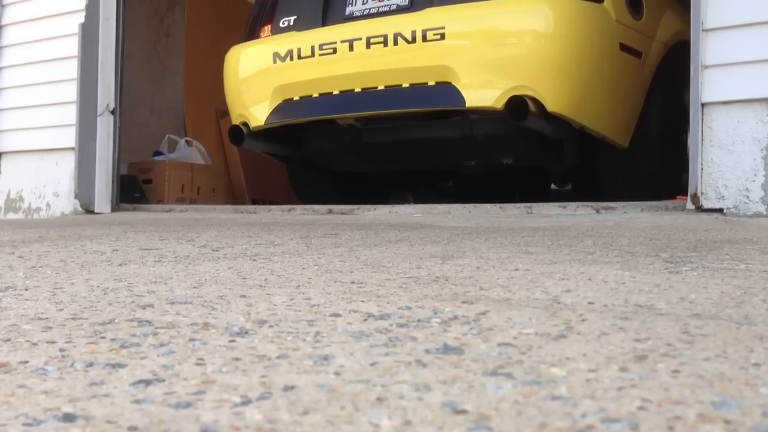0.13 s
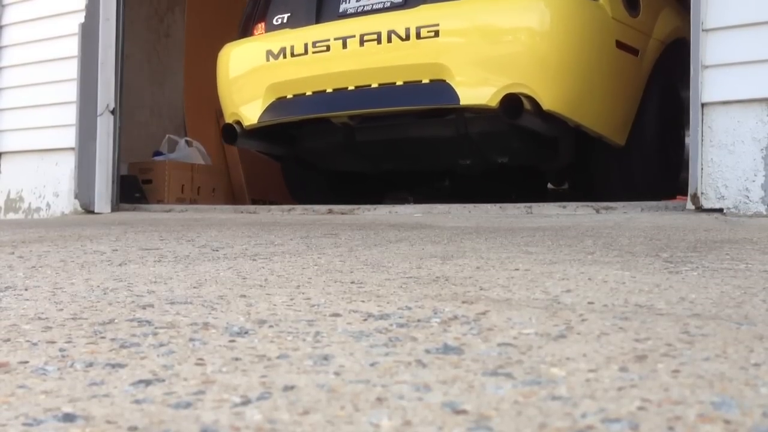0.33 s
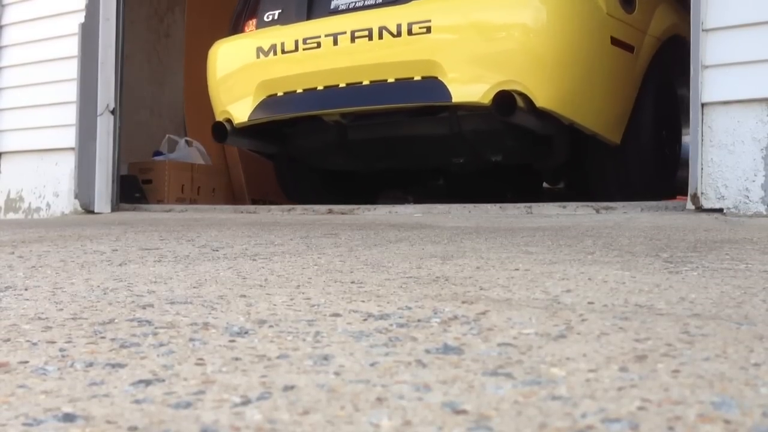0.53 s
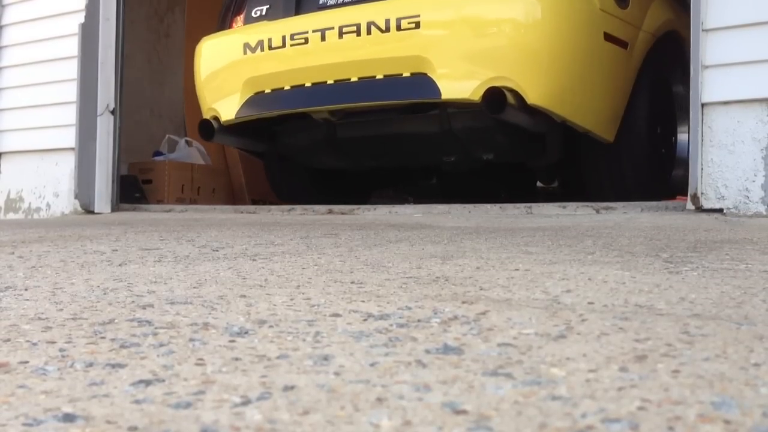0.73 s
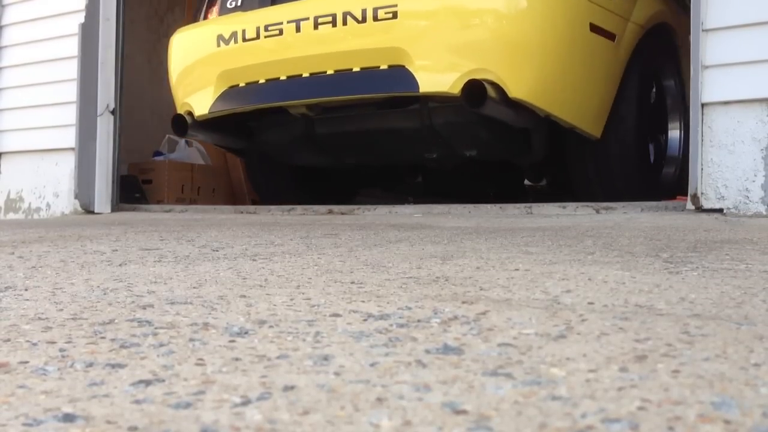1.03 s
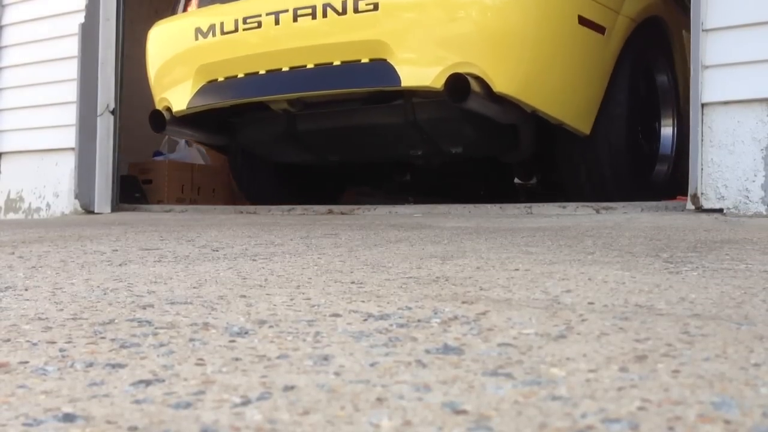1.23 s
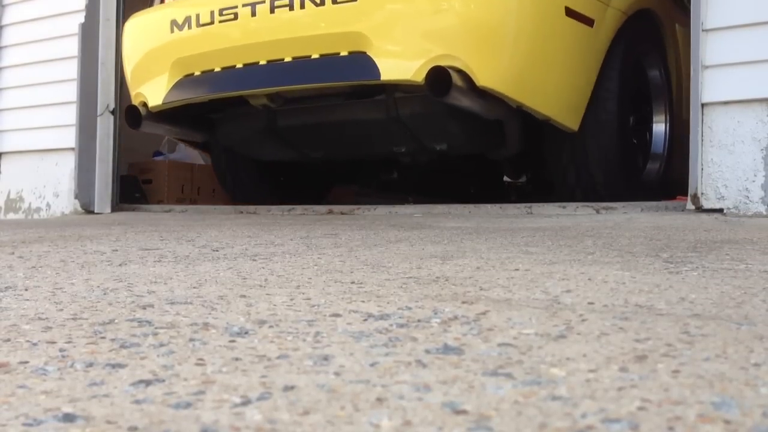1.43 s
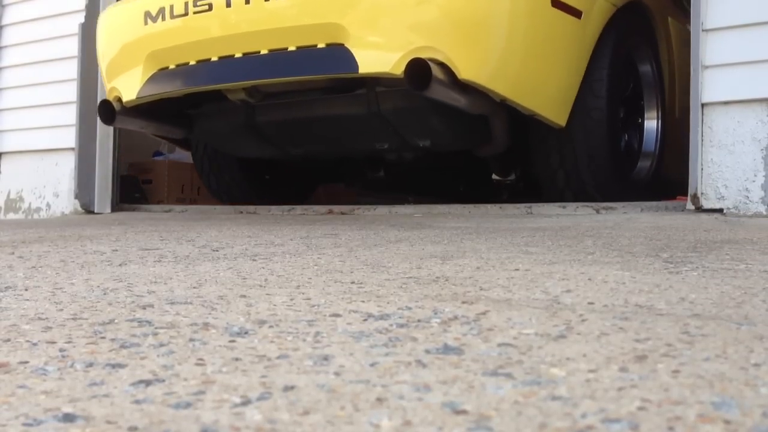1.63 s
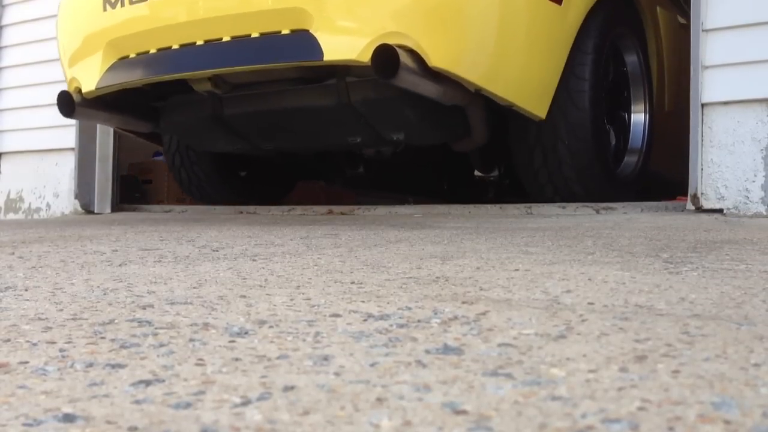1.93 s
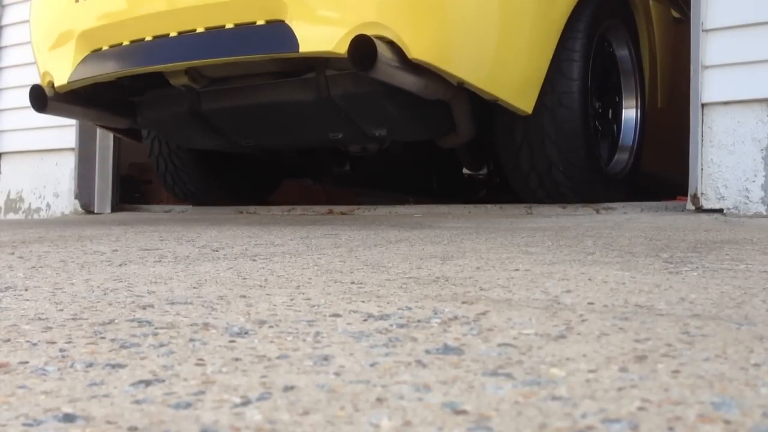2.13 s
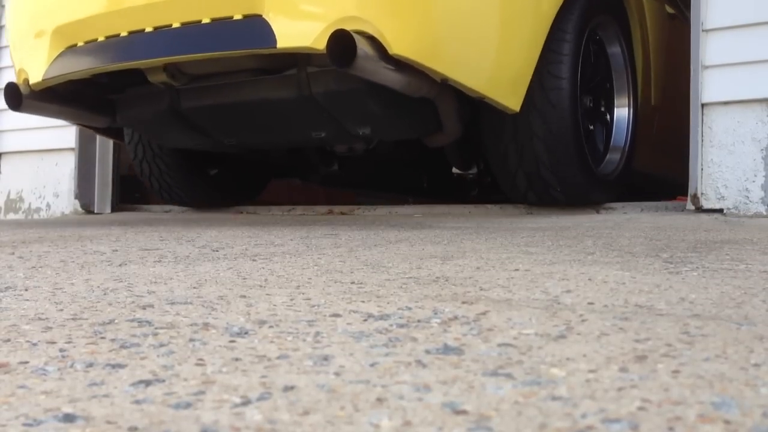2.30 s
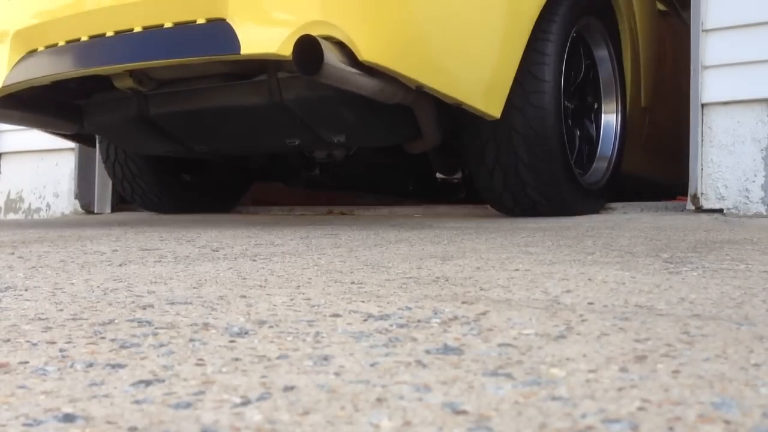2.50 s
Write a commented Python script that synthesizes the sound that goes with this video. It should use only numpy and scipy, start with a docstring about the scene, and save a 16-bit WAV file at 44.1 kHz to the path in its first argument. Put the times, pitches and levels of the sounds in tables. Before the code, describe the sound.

The deep, throbbing exhaust of a V8 car echoes in a garage, then turns louder, quicker and more direct as the car reverses toward a ground-level microphone outside, with a faint engine hiss and light tyre crackle.

```python
"""A V8 sports car backs slowly out of a garage towards a microphone lying on the driveway.
At first it is off-mic: eight unequal exhaust pulses per lumpy cycle boom between the walls, while
belts and fan hiss. After about a second grit snaps and rubber scrapes under the tyres, and hard
firings bark as the revs rise. From a second and a half the tailpipes are close and heard directly,
gas rushing with each pulse, and a few mechanical rasps come through towards the end."""
import sys
import numpy as np
from scipy import signal
from scipy.io import wavfile
from scipy.ndimage import uniform_filter1d

SR = 44100
rng = np.random.default_rng(int(sys.argv[2]) if len(sys.argv) > 2 else 0)


def to_wav(s):
    """Save 16-bit WAV."""
    ch = np.atleast_2d(s).T  # columns
    pcm = np.round(np.clip(ch, -1, 1) * 32767)  # PCM
    wavfile.write(sys.argv[1], SR, pcm.astype(np.int16))


N = 117306
T = np.arange(N) / SR

# engine speed in cycles of eight firings: t/s, rate/Hz
ENGINE_SPEED = [(0.0, 6.771), (0.2, 6.932), (0.4, 6.919), (0.6, 6.925), (0.8, 6.833), (0.95, 6.904),
                (1.08, 7.042), (1.22, 7.222), (1.35, 7.51), (1.48, 8.401), (1.6, 9.361), (1.74, 9.498),
                (1.9, 9.48), (2.1, 9.393), (2.35, 9.317), (2.66, 9.42)]
# cylinders in firing order: extra travel to the microphone/s, level/dB
CYLINDERS = [(0.0005, -0.7), (0.0092, -4.7), (0.0085, 1.3), (0.007, -1.9), (0.0038, -46.2), (0.001, -3.2),
             (0.0045, -3.8), (0.0056, -13.4)]
# balance at the microphone as the car nears: t/s, direct exhaust/dB, garage boom/dB
APPROACH = [(0.0, -63, -31.5), (0.2, -54, -28), (0.4, -32.5, -32), (0.7, -43, -28.5), (0.9, -48, -28.5),
            (1.1, -27, -26.4), (1.3, -29.5, -26), (1.5, -21, -26.5), (1.6, -17.5, -23.5), (1.9, -17, -28),
            (2.2, -17.5, -25.5), (2.7, -16.5, -31.9)]
# exhaust pulse on the direct path: f/Hz, level/dB
EXHAUST_COLOUR = [(30.0, -50.6), (75.0, -46.5), (90.0, -42), (103.0, -9), (118.0, -10.5), (165.0, -31),
                  (195.0, -7.5), (260.0, -3), (290.0, -5), (345.0, -3.6), (380.0, 1.5), (408.0, -22),
                  (460.0, 0), (520.0, -22.5), (670.0, -25), (850.0, -41.5), (1300, -44), (2500, -99.5)]
# pipe and muffler resonances and a notch: f/Hz, width/Hz, lift/dB
PIPE_RESONANCES = [(102, 12, 9), (113, 6.9, -17), (169, 4.5, 11), (195, 16.5, 19), (220.5, 13.8, 9),
                   (267.9, 9.9, 14), (319, 50, 5)]
# muffler chambers: f/Hz, width/Hz
MUFFLER_CHAMBERS = [(283, 67), (358, 115)]
# exhaust pulse scattered under the car: f/Hz, level/dB
SCATTER_COLOUR = [(100, -41), (300, -2), (450, 1), (520, -24), (570, -6), (690, 3), (850, 1.5), (1000, -16),
                  (1400, -16), (2500, -38), (6000, -56)]
# gas rush at the tailpipes: f/Hz, level/dB
RUSH_COLOUR = [(100, -58), (300, -6), (520, 10), (700, 9), (950, -6), (1400, -12), (2000, -13.5),
               (4000, -23), (15000, -48)]
# gas rush at the microphone: t/s, level/dB
RUSH_LEVEL = [(0, -41.5), (.2, -44.5), (.4, -47), (.9, -60), (1.3, -45), (1.5, -44.5), (1.65, -39.5),
              (1.9, -39), (2.2, -40), (2.66, -35.5)]
# hard firings: t/s, f/Hz, length/s, level/dB
BARKS = [(.2, 335, 0.051, -35), (0.343, 449, 0.066, -35.5), (1.058, 337, 0.091, -31),
         (1.143, 260, 0.062, -24.5), (1.194, 417, 0.013, -20.5), (1.245, 323.2, .03, -23),
         (1.315, 199.9, 0.052, -21.5), (1.378, 331.7, 0.032, -21), (1.484, 290, 0.028, -16.5),
         (1.518, 337, 0.046, -22), (1.545, 450, 0.042, -22.5), (1.587, 308.4, 0.044, -22.5),
         (1.809, 339.8, 0.017, -16)]
# where in the engine cycle the bass peaks: t/s, phase/cycles
BOOM_PEAK = [(0, .85), (1.05, .85), (1.3, .2), (1.6, .3)]

# exhaust pulse heard through the garage: f/Hz, level/dB
GARAGE_COLOUR = [(30.0, -23), (72.0, -47), (88.0, 4.5), (100.0, 7.7), (150.0, 7), (230.0, 1.9),
                 (265.0, 4.5), (300.0, 7), (370.0, 6.5), (400.0, -12.5), (450.0, 3), (510.0, -6),
                 (680.0, -10.5), (850.0, -25), (1300, -33), (2500, -46.5), (6000, -46)]
# wall reflections: delay/s, drift/(s per s), level/dB
WALL_ECHOES = [(0.0208, -0.0003, 1.8), (0.0227, 0.0006, -6.1), (0.0352, 0.0006, -1.6),
               (0.0517, -0.0003, -0.0102), (0.0757, 0.0005, -4.1), (0.0974, 0.0001, -1.6)]
# strong modes of the garage: f/Hz, width/Hz
ROOM_MODES = [(128, 12), (193, 9), (266, 16)]
# those modes from the driveway: t/s, low mode/dB, middle mode/dB, high mode/dB
MODE_LEVELS = [(0.0, -45.9, -41, -35.5), (0.2, -36.5, -41, -35), (0.4, -37, -36, -28.5),
               (0.6, -46, -67, -26), (0.8, -43, -30, -25.5), (1.0, -30, -70, -32), (1.2, -43, -38, -43),
               (1.3, -25.5, -14.5, -45), (1.4, -43, -35, -28.5), (1.6, -32, -47, -61), (1.9, -32, -38, -32),
               (2.1, -41, -35, -50), (2.7, -47, -25.5, -28.7)]

# grit snapping under the tyres: t/s, peak/dB
GRIT_SNAPS = [(.792, -42), (.995, -43), (1.18, -37), (1.209, -40), (1.336, -31), (1.343, -19.5),
              (1.4665, -27), (1.5385, -33), (1.567, -34), (1.611, -35), (1.628, -35), (1.636, -36),
              (1.654, -38), (1.983, -34), (2.612, -33)]
# cracking grit and sand: f/Hz, level/dB
GRIT_COLOUR = [(300, -50), (1000, -30), (4000, -13), (5500, -1), (8000, 0), (11000, -2.5), (13000, -9),
               (15500, -13)]
# sand crackle: t/s, level/dB
SAND_LEVEL = [(0, -75), (1.05, -70), (1.16, -61), (1.27, -71), (1.47, -70), (1.6, -57), (1.72, -61),
              (2.66, -59)]
# rubber scraping on concrete: t/s, length/s, level/dB
SCRAPES = [(1.007, 0.019, -44), (1.154, 0.029, -43), (1.343, 0.03, -39.5), (1.532, 0.023, -44),
           (1.583, 0.046, -43.5)]
# tone of the scrapes: f/Hz, level/dB
SCRAPE_COLOUR = [(500, -36), (2500, -23), (3800, 3), (5500, 1), (8000, -14), (15000, -27)]

# belts, fan and intake: f/Hz, level/dB
HISS_COLOUR = [(200, -28), (800, 8.5), (1500, 5), (1900, 0), (2500, 1), (3300, 0), (4200, -0.5), (5500, -4),
               (7200, -8), (9000, -14), (11000, -20.5), (13000, -25.5), (15200, -29)]
# their hiss as the car nears: t/s, relative level/dB
HISS_LEVEL = [(0, -48.5), (.5, -49.5), (.9, -47), (1.2, -45), (1.6, -42.5), (2.66, -43)]
# mechanical rasps: t/s, length/s, level/dB
RASPS = [(1.93, .04, -44), (1.975, 0.028, -47), (2.03, 0.028, -45), (2.25, 0.053, -43.5), (2.485, .02, -43)]
# tone of the rasps: f/Hz, level/dB
RASP_COLOUR = [(500, -42), (2000, -18), (2500, 1), (3000, -3), (3600, -13), (15000, -52)]
# low air rumble: f/Hz, level/dB
RUMBLE_COLOUR = [(10, -10), (35, -1), (70, 0), (110, -8), (300, -40), (1000, -80)]
# rumble at the microphone: t/s, level/dB
RUMBLE_LEVEL = [(0, -63), (.9, -62), (1.45, -53), (2.66, -53)]


def amp(db):
    """Decibels to gain."""
    return 10 ** (np.asarray(db) / 20)


def unit(x):
    """Scales to rms 1."""
    return x / np.sqrt(np.mean(x ** 2) + 1e-20)


def curve(table, column=1):
    """One column of a time table at every sample."""
    rows = np.array(table)
    return np.interp(T, rows[:, 0], rows[:, column])


def colour(x, spectrum, peaks=(), size=32768):
    """Minimum-phase filter from a spectrum table and narrow resonances."""
    hz = abs(np.fft.fftfreq(size, 1 / SR))
    table_hz, table_db = np.transpose(spectrum)
    db = np.interp(np.log(hz + 1), np.log(table_hz), table_db)
    db += sum(lift / (1 + (2 * (hz - f) / width) ** 2) for f, width, lift in peaks)
    response = np.exp(np.conj(signal.hilbert(np.log(amp(db)))))
    taps = np.fft.ifft(response).real[:size // 2]
    return signal.fftconvolve(x, taps)[:len(x)]


def cycles(t, zero_s=2.289):
    """Engine cycles at times t, counted from zero_s."""
    turns = np.cumsum(np.interp(t, *np.transpose(ENGINE_SPEED))) / SR
    return turns - np.interp(zero_s, t, turns)


def firings(spread_db=0.8, jitter_s=0.00015):
    """One click per cylinder firing, starting half a second early so the garage already rings."""
    t = np.arange(-(SR // 2), N) / SR
    turns, count = cycles(t), len(CYLINDERS)
    firing = np.arange(np.ceil(turns[0] * count), turns[-1] * count).astype(int)
    travel, db = np.array(CYLINDERS)[firing % count].T
    strength, timing = rng.standard_normal((len(firing), 2)).T
    arrival_s = np.interp(firing / count, turns, t) + travel + jitter_s * timing
    samples = np.clip(np.searchsorted(t, arrival_s), 0, len(t) - 1)
    clicks = np.zeros(len(t))
    np.add.at(clicks, samples, amp(db + spread_db * strength))
    return clicks


def muffler(x):
    """Each chamber delays the sound near its own pitch, so a pulse swells instead of cracking."""
    for hz, width in MUFFLER_CHAMBERS:
        radius = np.exp(-np.pi * width / SR)
        poles = [1, -2 * radius * np.cos(2 * np.pi * hz / SR), radius ** 2]
        x = signal.lfilter(poles[::-1], poles, x)  # all-pass
    return x


def exhaust(clicks, scatter_s=0.013, scatter_db=-26):
    """Pulses ring the pipes and reach the microphone directly, or smeared between car and ground."""
    t = np.arange(SR // 20) / SR
    bounces = rng.standard_normal(len(t)) * t * np.exp(-t / scatter_s)
    scattered = colour(signal.fftconvolve(clicks, bounces)[:len(clicks)], SCATTER_COLOUR)
    direct = colour(muffler(clicks), EXHAUST_COLOUR, PIPE_RESONANCES)
    return (unit(direct[-N:]) + amp(scatter_db) * unit(scattered[-N:])) * amp(curve(APPROACH))


def gas_rush(clicks, decay_s=0.033):
    """A puff of turbulence leaves the tailpipe with each pulse."""
    puffs = signal.lfilter([1], [1, -np.exp(-1 / (decay_s * SR))], clicks)
    rush = colour(puffs * rng.standard_normal(len(puffs)), RUSH_COLOUR)
    return unit(rush[-N:]) * amp(curve(RUSH_LEVEL))


def barks(rise_hz_per_s=900, waver_hz=24.9):
    """A hard firing rings the pipe in a short, rough note that bends upward."""
    out = np.zeros(N)
    for s, hz, length, db in BARKS:
        waver = waver_hz * unit(uniform_filter1d(rng.standard_normal(N), size=300))
        turns = np.cumsum(hz + rise_hz_per_s * (T - s) + waver) / SR + rng.random()
        swell = amp(db) * np.exp(-(2 * (T - s) / length) ** 2)
        out += swell * np.sqrt(2) * np.sin(2 * np.pi * turns)
    return out


def lope(depth_db, peak_cycle=0.22):
    """A gain that surges once per engine cycle, like the tailpipe flow."""
    return amp(depth_db * np.cos(2 * np.pi * (cycles(T) - peak_cycle)))


def boom_throb(engine, below_hz=150, depth_db=2.8):
    """The engine with its deep boom throbbing once per cycle."""
    boom = signal.sosfiltfilt(signal.butter(4, below_hz, fs=SR, output="sos"), engine)
    return engine + boom * (lope(depth_db, curve(BOOM_PEAK)) - 1)


def garage(clicks, t60_s=0.62, diffuse_above_hz=480, diffuse_db=3):
    """The pulses bounce between the walls and out to the driveway, on paths that shift as the car rolls."""
    t = np.arange(SR // 2) / SR
    tail = rng.standard_normal(len(t)) * amp(-60 * t / t60_s)
    tail = signal.sosfilt(signal.butter(4, diffuse_above_hz, "highpass", fs=SR, output="sos"), tail)
    diffuse = signal.fftconvolve(clicks, tail / np.linalg.norm(tail))[:len(clicks)]
    room = clicks + amp(diffuse_db) * diffuse
    now = np.arange(N - len(clicks), N) / SR
    for delay, drift, db in WALL_ECHOES:
        room += amp(db) * np.interp(now - delay - drift * now, now, clicks)
    return unit(colour(room, GARAGE_COLOUR)[-N:]) * amp(curve(APPROACH, column=2))


def standing_waves(clicks):
    """Three room modes swell and fade as the tailpipes move through their nodes."""
    t, out = np.arange(SR // 2) / SR, np.zeros(N)
    for column, (hz, width) in enumerate(ROOM_MODES, start=1):
        ring = t * np.exp(-2 * np.pi * width * t) * np.sin(2 * np.pi * hz * t)
        mode = signal.fftconvolve(clicks, ring)[:len(clicks)]
        out += unit(mode[-N:]) * amp(curve(MODE_LEVELS, column))
    return out


def grit(snap_s=0.0006, echo_s=0.007, echo_db=-17):
    """Grains crack under the tyres, level with the microphone, each with a short echo."""
    t, out = np.arange(SR // 20) / SR, np.zeros(N)
    envelope = np.exp(-t / snap_s) + amp(echo_db) * np.exp(-t / echo_s)
    for s, db in GRIT_SNAPS:
        snap = colour(envelope * rng.standard_normal(len(t)), GRIT_COLOUR, size=1024)
        slot = out[round(s * SR):][:len(snap)]
        slot += amp(db) * snap[:len(slot)] / abs(snap).max()
    return out


def sand(grains_per_s=2400, spread_db=2):
    """Fine sand crackles as the tyres roll over the threshold."""
    grains = (rng.random(N) < grains_per_s / SR) * rng.standard_normal(N)
    grains *= amp(spread_db * rng.standard_normal(N))
    return unit(colour(grains, GRIT_COLOUR, size=1024)) * amp(curve(SAND_LEVEL))


def friction(events, spectrum):
    """Rubbing surfaces give short swells of noise: tyre scrapes or mechanical rasps."""
    swells = sum(amp(db) * np.exp(-(2 * (T - s) / length) ** 2) for s, length, db in events)
    return unit(colour(rng.standard_normal(N), spectrum, size=1024)) * swells


def engine_hiss(gain_db=4, patch_db=1.5, throb_depth=0.089):
    """Belts, fan and intake: patchy noise that throbs at the firing rate."""
    hz, _, frames = signal.stft(rng.standard_normal(N), SR, nperseg=512)
    patches = uniform_filter1d(rng.standard_normal(frames.shape), size=4, axis=0)  # across frequency
    patches = unit(uniform_filter1d(patches, size=12, axis=1))  # across time
    table_hz, table_db = np.transpose(HISS_COLOUR)
    db = np.interp(np.log(hz + 1), np.log(table_hz), table_db)[:, None] + patch_db * patches
    noise = signal.istft(frames * amp(db))[1][:N]
    throb = 1 + throb_depth * np.cos(2 * np.pi * len(CYLINDERS) * cycles(T))
    return unit(noise * throb) * amp(gain_db + curve(HISS_LEVEL))


def air_rumble():
    """Stirred air rumbles at the microphone."""
    return unit(colour(rng.standard_normal(N), RUMBLE_COLOUR)) * amp(curve(RUMBLE_LEVEL))


def scene():
    """Car and garage in mono, from ground level on the driveway."""
    clicks = firings()
    tailpipes = exhaust(clicks) + lope(depth_db=2.5) * gas_rush(clicks)
    engine = lope(depth_db=2.0) * tailpipes + garage(clicks) + standing_waves(clicks)
    engine = boom_throb(engine) + barks()
    tyres = grit() + sand() + friction(SCRAPES, SCRAPE_COLOUR)
    background = engine_hiss() + friction(RASPS, RASP_COLOUR) + air_rumble()
    return (engine + tyres + background)[None]


def record(dry):
    """The microphone chain passes 18 Hz to 15.35 kHz."""
    low_cut = signal.butter(2, 18, "highpass", fs=SR, output="sos")
    high_cut = signal.firwin(1023, 15350, window=("kaiser", 9), fs=SR)
    return signal.oaconvolve(signal.sosfilt(low_cut, dry), high_cut[None], "same")


dry = scene()
out = record(dry)
to_wav(out)
```